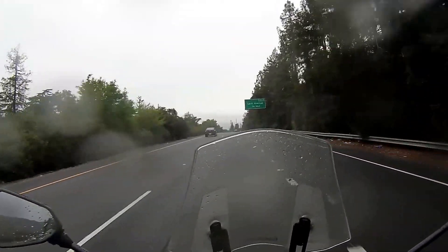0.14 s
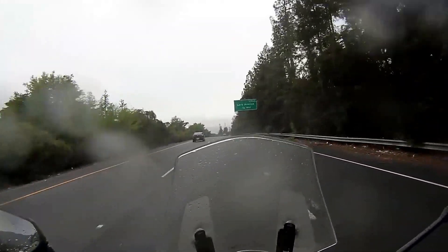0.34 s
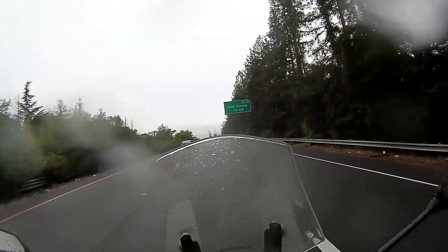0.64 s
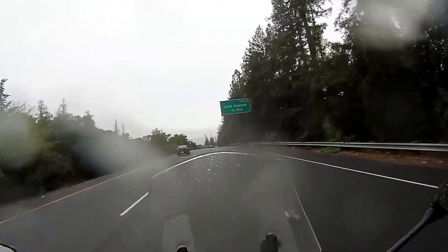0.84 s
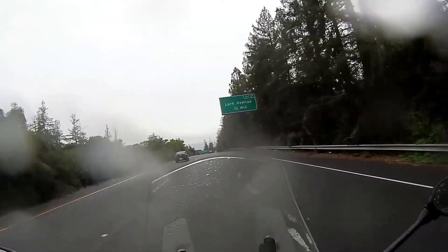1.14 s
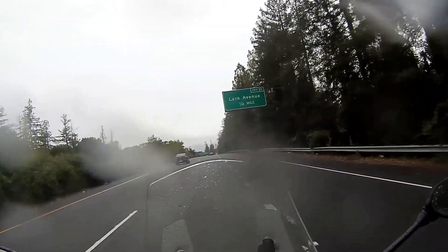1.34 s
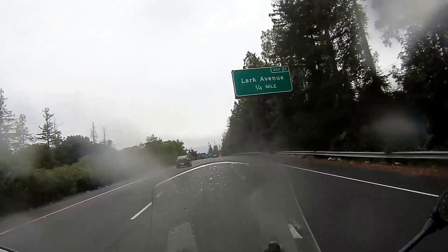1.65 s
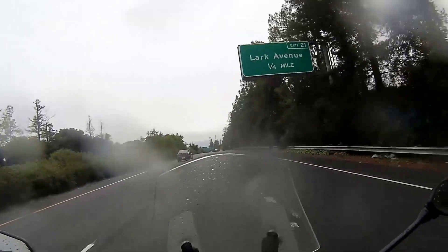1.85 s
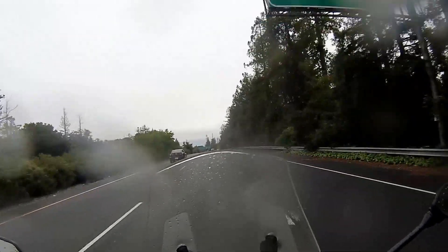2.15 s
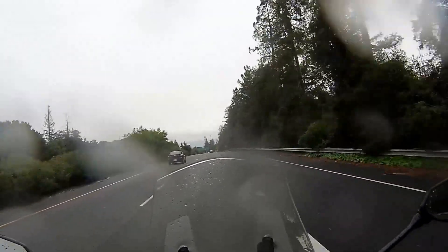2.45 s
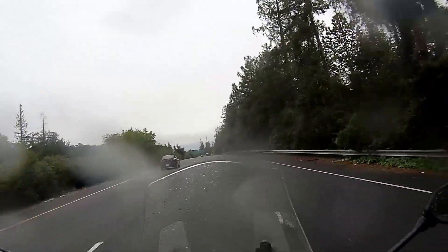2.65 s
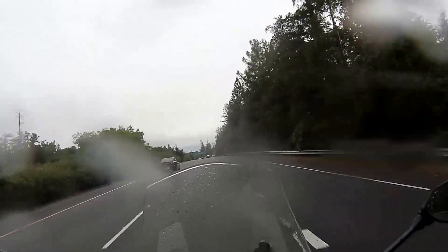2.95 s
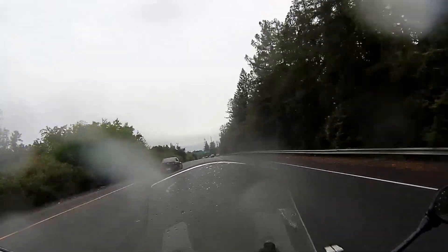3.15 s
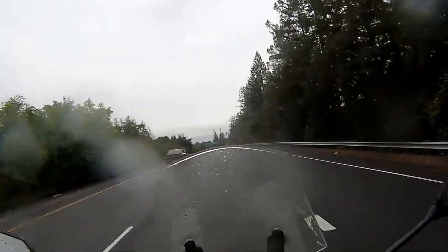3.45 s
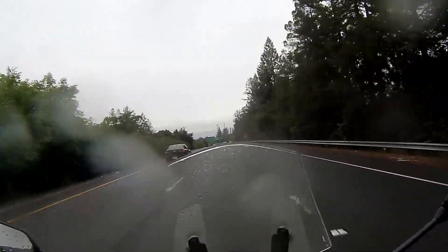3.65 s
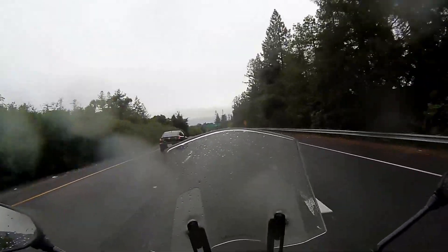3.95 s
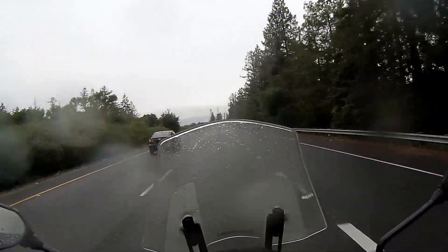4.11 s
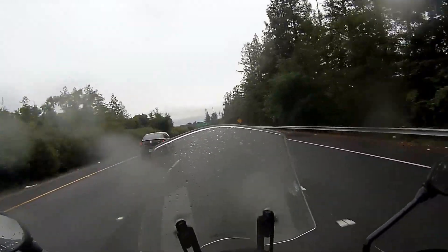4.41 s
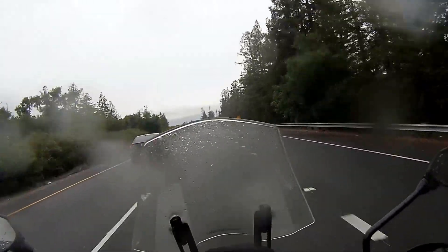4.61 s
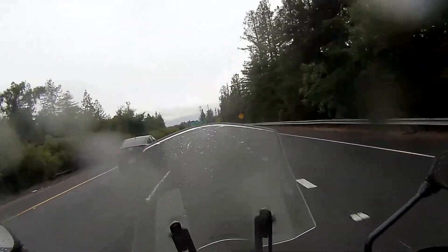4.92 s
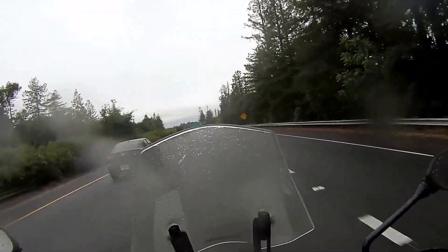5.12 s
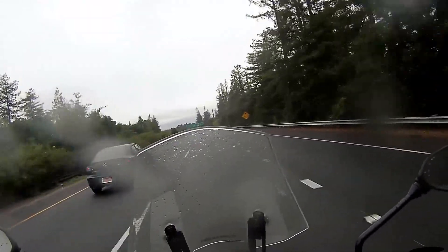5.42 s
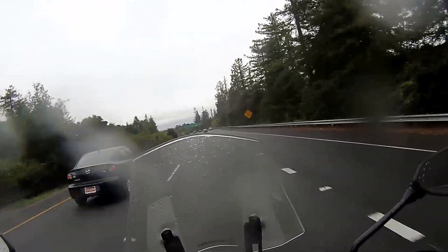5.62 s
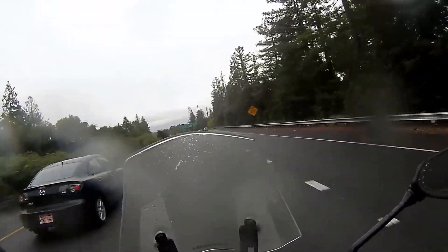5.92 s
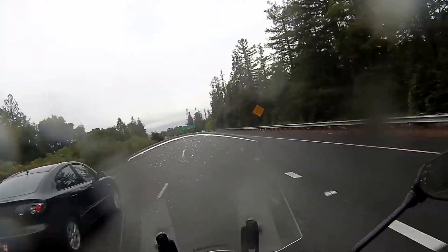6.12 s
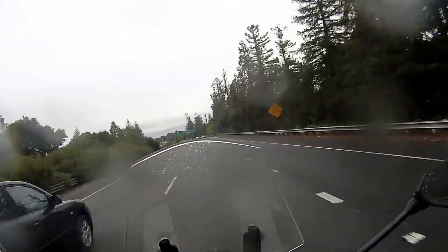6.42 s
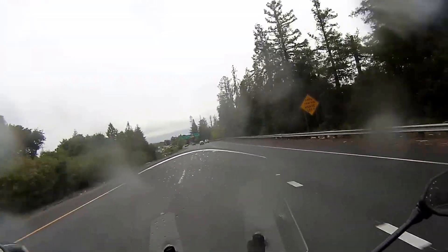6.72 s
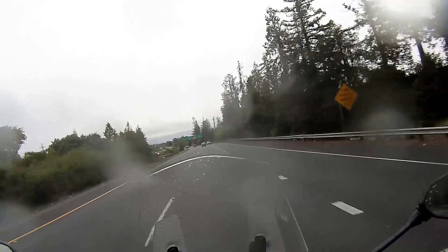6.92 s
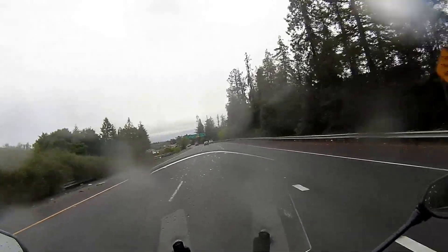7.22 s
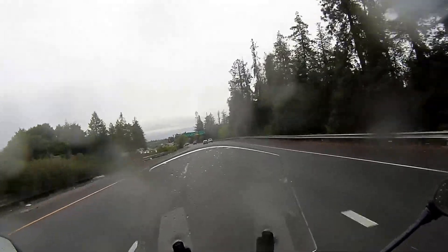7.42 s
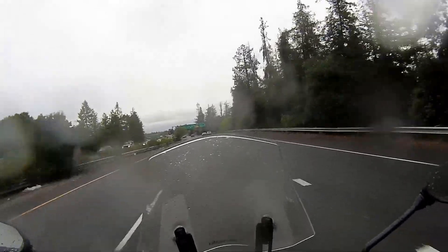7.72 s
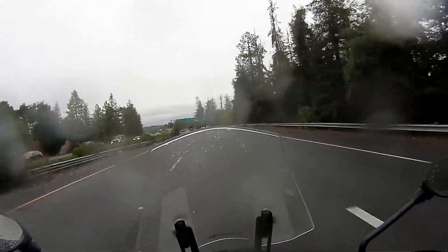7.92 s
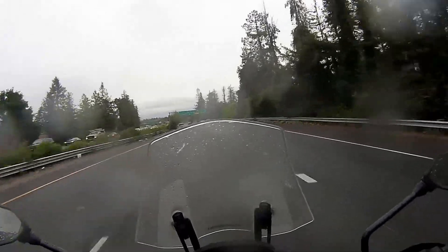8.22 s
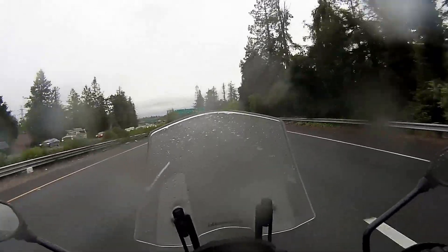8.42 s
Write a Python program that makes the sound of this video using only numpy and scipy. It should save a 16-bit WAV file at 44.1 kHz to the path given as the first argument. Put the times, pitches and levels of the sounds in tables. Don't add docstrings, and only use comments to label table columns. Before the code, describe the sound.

Rapid, uneven plastic knocking dominates from start to finish, single blows mixed with pairs and bursts of three or four, plus dull bumps. Deep fluttering wind swells and lulls around them. Behind it come muffled wet-tyre noise, sparse bright rain ticks, and a weak low engine drone. The close, boxed-in microphone sounds gritty, harsh and clipped, with thin bass on the right side.

```python
import sys
import numpy as np
from scipy import signal
from scipy.fft import rfft, irfft
from scipy.io import wavfile
from scipy.ndimage import uniform_filter1d

SR = 44100
rng = np.random.default_rng(int(sys.argv[2]) if len(sys.argv) > 2 else 0)


def transcribe(signal):
    frames = np.atleast_2d(signal).T
    limited = np.clip(frames, -1, 1)
    pcm = np.round(limited * 32767).astype(np.int16)
    wavfile.write(sys.argv[1], SR, pcm)


def voltage_ratio(decibels):
    exponent = np.asarray(decibels, float) / 20
    return 10 ** exponent


N = 377496
MOUNT_HZ, MOUNT_T60_S = 59.4, 0.098


def rms_one(x):
    return x / np.sqrt(np.mean(x ** 2) + 1e-20)


def drift(rate):
    r = np.exp(-80 * np.pi * rate / SR)
    noise = rng.standard_normal(N // 40 + 2002)
    slow = signal.lfilter([1], [1, -2 * r, r * r], noise)[2000:]
    return np.interp(np.arange(N) / 40, np.arange(len(slow)), rms_one(slow))


def clicks(seconds, sizes):
    train = np.full(N, 1e-18)
    at = np.round(np.asarray(seconds) * SR).astype(int)
    np.add.at(train, np.clip(at, 0, N - 1), sizes)
    return train


def ring(train, hz, t60):
    r, w = voltage_ratio(-60 / (t60 * SR)), 2 * np.pi * hz / SR
    return signal.lfilter([0, np.sin(w)], [1, -2 * r * np.cos(w), r * r], train)


def strike(seconds, sizes, modes, ways, spread_db):
    chance = rng.standard_normal((len(seconds), len(modes)))
    total = 0
    for k, (hz, db, t60) in enumerate(modes):
        heights = ways[k] * sizes * voltage_ratio(db + spread_db * chance[:, k])
        total = total + ring(clicks(seconds, heights), hz, t60)
    return total


def patchy_noise(spectrum, shared_db, own_db, rate):
    hz = np.maximum(np.fft.rfftfreq(N, 1 / SR), 1)
    knots, level_db = np.transpose(spectrum)
    colour = rfft(rng.standard_normal(N)) * voltage_ratio(np.interp(np.log(hz), np.log(knots), level_db, right=-90))
    out, together = 0, drift(rate)
    for octave in range(4, 14):
        share = np.clip(1 - abs(np.log2(hz) - octave), 0, 1)
        if octave == 4:
            share[hz < 16] = 1
        out = out + irfft(colour * share, N) * voltage_ratio(shared_db * together + own_db * drift(rate))
    return rms_one(out)


# frequency in Hz, level in dB, decay time t60 in s.
THUD_MODES = [
    (306, -7, .0175),
    (650, -3, .004),
    (840, -6.5, .0046),
    (1260, -9.5, .007),
    (1910, -18, .025),
    (715, -19, .02),
    (915, -23, .022),
]
# frequency in Hz, level in dB, decay time t60 in s.
RING_MODES = [
    (2346, 16, 0.0068),
    (2790, 18, 0.0087),
    (3342, 28, 0.0049),
    (3615, 25.5, 0.0068),
    (4580, 24, 0.0041),
]
THUD_WAY, RING_WAY = (1, -1, 1, -1, -1, 1, -1), (-1, 1, 1, -1, 1)


def knock(seconds, ring_db, thud_db):
    pull = clicks(seconds - .0003, .38 * voltage_ratio(thud_db))
    push = clicks(seconds, 1.08 * voltage_ratio(thud_db)) - pull
    fall, soft = np.exp(-1 / (.00127 * SR)), np.exp(-1 / (.0002 * SR))
    thud = signal.lfilter([1], [1, -fall], push)
    thud = thud + strike(seconds, voltage_ratio(thud_db), THUD_MODES, THUD_WAY, spread_db=-0.6)
    bright = strike(seconds, voltage_ratio(ring_db - 1.5), RING_MODES, RING_WAY, spread_db=1.58)
    rebound = np.roll(bright, round(0.0032 * SR)) * voltage_ratio(-13.0)
    return signal.lfilter([(1 - soft) ** 2], [1, -2 * soft, soft ** 2], thud + bright + rebound)


def hard_knocks(s, ring_db, thud_db):
    swing = ring(clicks(s - .0105, -voltage_ratio(0.66 * thud_db - 9.5)), MOUNT_HZ, MOUNT_T60_S)
    return knock(s, ring_db, thud_db) + swing


# start in seconds, ring level in dB.
LONE_BLOWS = [(0.0306, -17), (0.376, -20.5), (0.4507, -18.5), (0.4888, -13), (0.6142, -19.5),
              (0.6622, -18.5), (1.0701, -12.5), (1.2283, -17), (1.3167, -15.5), (1.8471, -17),
              (1.8877, -14), (1.9775, -23), (2.711, -21), (3.4537, -20), (4.0553, -19.5), (4.1822, -17),
              (5.0454, -14), (5.1664, -17), (5.2561, -16.5), (5.3335, -15.5), (5.4957, -20),
              (5.8648, -17.5), (5.6475, -17.5), (5.9724, -20), (6.2955, -17.5), (6.5073, -16),
              (6.6643, -18), (7.6224, -15.5), (7.6729, -19.5), (7.8936, -17.5)]
# start in seconds, one swing in s, harder second blow in dB, first weaker by dB.
GROWING_PAIRS = [(0.1262, .0172, -11, 7.5), (0.233, 0.018, -9.5, 16), (0.5486, 0.015, -12.5, 6),
                 (0.7239, 0.019, -15, 4), (1.133, 0.021, -21, -1), (2.2218, 0.022, -13, 6),
                 (2.2654, 0.019, -9, 9.5), (2.307, .0184, -13.5, 1.2), (2.5305, .0192, -16.5, 1.5),
                 (2.8503, 0.016, -14.5, 5), (3.1528, .018, -13, 9), (3.8041, 0.017, -10.5, 4),
                 (4.7354, .0209, -19.5, 6), (5.613, .015, -14.5, 1.5), (6.019, 0.022, -15, 2.5),
                 (6.1659, 0.018, -16.5, 0), (6.5727, 0.017, -11.5, 2.5)]
# start in seconds, one swing in s, first blow in dB, bounce weaker by dB.
DYING_PAIRS = [(0.1904, 0.018, -16.5, 4.5), (0.8904, 0.016, -23.5, 2.5), (2.4715, 0.02, -14, 0.5),
               (2.7547, 0.019, -12, 8), (3.046, .0171, -13, 19), (3.292, .0194, -14, 3),
               (3.498, .0232, -14, 12), (3.5622, 0.02, -21, 0), (3.6537, 0.021, -21, -2.5),
               (3.9621, 0.019, -17, -1), (4.1067, .0251, -13, 7), (4.4221, 0.019, -17.5, 3),
               (5.1086, 0.017, -21.5, 2), (5.6684, .0231, -23.5, .3), (6.3942, 0.018, -17.5, 2),
               (6.8736, .0169, -15, 3.5), (6.9619, .0205, -21.5, 1.5), (7.125, 0.018, -13, 9),
               (7.3003, 0.019, -10.5, 12), (7.738, .0107, -21, 5), (7.8027, .0181, -18, 1),
               (7.9984, 0.016, -23, 0), (8.3532, .0168, -20.5, -0.5)]
# start in seconds, one swing in s, crest level in dB, crest delay in swings.
RATTLES_OF_THREE = [(0.2977, 0.016, -11.5, 0.19), (1.4097, 0.013, -13, 1.4), (1.5698, 0.016, -12, 1),
                    (1.7453, 0.013, -14, 0.59), (2.037, .0149, -12, 0.28), (2.3927, 0.019, -18, 0.76),
                    (2.6164, 0.017, -10.5, .95), (3.2332, .018, -10, 0.31), (6.7969, 0.015, -13, 0.96),
                    (8.2177, .0214, -19.5, 1.4)]
# start in seconds, one swing in s, crest level in dB, crest delay in swings.
RATTLES_OF_FOUR = [(1.5114, 0.016, -15, 1.6), (2.132, 0.017, -9.5, 0.3), (4.3098, .0188, -16, 0.89),
                   (4.649, 0.019, -21, 0.92), (5.3604, .02, -12, 0.96), (7.0316, .023, -21, 1.3),
                   (7.3498, 0.023, -12, 1.1)]
# start in seconds, thud level in dB.
DULL_BUMPS = [(0.0185, -0.5), (0.583, -15), (0.5997, -7), (0.7024, -3.5), (1.0855, -3), (1.3, -6),
              (1.3322, -3.5), (1.454, -12), (1.834, -6), (2.6018, -2), (3.0021, -7), (4.544, -5),
              (4.808, -15), (5.279, -7), (5.748, -3.5), (6.1453, -10), (6.1956, -3), (6.3384, -4),
              (6.527, -13), (6.781, -3), (7.846, -6)]
FADE_DB = 2.5
BUMP_RING_DB = -24
THUD_DB, THUD_FOLLOWS, THUD_SPREAD_DB = -2, 0.64, 1.5
THUD_DUCKED, THUD_OF_SLAM = 0.27, 0.21


def blows(gain_db):
    rows = list(LONE_BLOWS)
    for s, gap, db, less in GROWING_PAIRS:
        rows += [(s, db - less), (s + gap, db)]
    for s, gap, db, less in DYING_PAIRS:
        rows += [(s, db), (s + gap, db - less)]
    for count, fade_db, table in ((3, FADE_DB, RATTLES_OF_THREE), (4, FADE_DB / 2, RATTLES_OF_FOUR)):
        for s, gap, db, crest in table:
            rows += [(s + k * gap, db - fade_db * (k - crest) ** 2) for k in range(count)]
    s, ring_db = np.transpose(rows)
    now = gain_db[(s * SR).astype(int)]
    soon = gain_db[((s + .008) * SR).astype(int)]
    thud_db = THUD_DB + THUD_FOLLOWS * (ring_db + 18)
    thud_db = thud_db + THUD_DUCKED * now + THUD_OF_SLAM * np.maximum(now - soon, 0)
    thud_db = thud_db + THUD_SPREAD_DB * rng.standard_normal(len(s))
    bump_s, bump_db = np.transpose(DULL_BUMPS)
    return np.append(s, bump_s), np.append(ring_db, bump_db + BUMP_RING_DB), np.append(thud_db, bump_db)


# start in seconds, gain dip in dB.
FORWARD_OVERLOADS = [(0.145, 14), (0.492, 8.5), (0.743, 9.5), (1.889, 10), (2.163, 8.5), (2.286, 11),
                     (2.401, 2), (2.636, 15), (2.869, 11), (3.173, 14.5), (3.6, -1), (4.107, 10), (4.33, 7),
                     (5.047, 5), (5.335, 6.5), (5.379, 16.5), (6.183, 7), (6.296, 6.5), (6.395, 7),
                     (6.509, 12.5), (6.589, 13), (6.797, 10), (7.298, 5.5), (7.537, 2), (7.822, 6.5),
                     (8.285, 12.5)]
# start in seconds, gain dip in dB.
BACKWARD_OVERLOADS = [(1.541, 11.5), (2.049, 10), (2.425, 12.5), (2.698, -5), (3.761, 14), (4.59, 14.5),
                      (4.784, 14), (7.189, 11.5), (7.747, 6), (7.959, 10), (8.256, 13)]
RECOVERY_DB_PER_S = 84.5
WINDUP_DB, WINDUP_S = -10, 0.014


def slams():
    t, swing, gain_db = np.arange(N) / SR, np.zeros(N), np.zeros(N)
    for height, table in ((.3, FORWARD_OVERLOADS), (-0.74, BACKWARD_OVERLOADS)):
        for s, dip_db in table:
            near = slice(round((s - .03) * SR), round((s + .3) * SR))
            since = t[near] - s
            swing[near] += height * voltage_ratio(0.61 * dip_db - 8.0) * np.exp(-(since / 0.0021) ** 2)
            if height < 0:
                rock = np.cos(2 * np.pi * MOUNT_HZ * (since + 0.0016))
                rock = rock * np.exp(-((since + 0.0051) / WINDUP_S) ** 2)
                swing[near] -= voltage_ratio(WINDUP_DB) * rock * np.clip(.5 - since / 0.0038, 0, 1)
            onset = np.clip((since - .002) / 0.0013, 0, 1)
            dip = onset * np.minimum(RECOVERY_DB_PER_S * since - dip_db, 0)
            gain_db[near] = np.minimum(gain_db[near], dip)
    return swing, gain_db


# start in seconds, ring level in dB.
LIGHT_TOUCHES = [(0.784, -25.5), (0.827, -25), (0.9561, -22), (1.3782, -24), (1.63, -21.5), (1.9277, -22.5),
                 (2.018, -19.5), (2.446, -33), (2.671, -27), (2.693, -26), (2.8317, -26), (3.359, -27),
                 (3.842, -23.5), (3.861, -28), (3.883, -25), (3.903, -33), (4.5783, -20), (4.598, -29.5),
                 (5.9361, -22), (4.998, -20.5), (5.444, -25), (6.2138, -22), (6.5518, -24.5), (7.005, -29),
                 (7.256, -24.5), (7.517, -35), (8.279, -32), (8.304, -29), (8.445, -22.5), (8.5278, -21.5)]


def light_knocks():
    s, ring_db = np.transpose(LIGHT_TOUCHES)
    return knock(s, ring_db, ring_db + 17.0)


# frequency in Hz, level in dB per Hz.
BUFFET_SPECTRUM = [(12, -38), (30, -13.5), (45, -3), (56, 2.5), (75, 0), (110, -7.5), (160, -18),
                   (260, -24), (500, -62)]


def buffeting(level_db):
    return voltage_ratio(level_db + 8.5) * patchy_noise(BUFFET_SPECTRUM, shared_db=1.5, own_db=0.5, rate=12)


def held_still(s, thud_db):
    near = uniform_filter1d(clicks(s, np.minimum(voltage_ratio(thud_db), 1)), 701) * 701
    return 1 - .55 * uniform_filter1d(np.minimum(near, 1), 221)


def chatter(shake):
    s = np.flatnonzero((shake[:-1] < 0) & (shake[1:] >= 0)) / SR
    size_db = 1.7 * rng.standard_normal((len(s), 2))
    return knock(s, size_db[:, 0] - 32.0, size_db[:, 1] - 24.0)


# start in seconds, peak level in dB.
RAINDROPS = [(0.117, -37), (0.202, -30.5), (0.403, -30.5), (0.886, -41), (1.017, -30), (1.05, -27),
             (1.533, -32), (2.28, -35), (2.424, -25), (3.029, -32), (3.4, -35), (3.638, -27), (4.69, -31),
             (5.095, -31), (5.114, -30), (5.683, -36), (5.812, -36), (6.221, -36), (7.643, -33),
             (7.655, -37), (7.745, -32), (7.79, -29)]
# frequency in Hz, level in dB, decay time t60 in s.
SHELL_MODES = [
    (4500, -3, .007),
    (5400, -3, .006),
    (3300, -12, .005),
]


def raindrops():
    s, peak_db = np.transpose(RAINDROPS)
    return strike(s, voltage_ratio(peak_db + 10.0), SHELL_MODES, (1, -1, 1), spread_db=3.0)


# frequency in Hz, level in dB per Hz.
SPRAY_SPECTRUM = [(80, 17.5), (150, 17.5), (330, 12.5), (520, -2), (700, -3), (1000, -3.5), (1400, -7.5),
                  (1700, -13), (2500, -11), (3000, -15.5), (4400, -17), (6600, -18)]


def road_spray(level_db):
    return voltage_ratio(level_db + 18.5) * patchy_noise(SPRAY_SPECTRUM, shared_db=1.97, own_db=1.23, rate=38)


# time in seconds, buffeting level in dB, road and spray level in dB.
RIDE_LEVELS = [(0, -23.5, -38), (1, -22, -37), (2, -20.5, -36.5), (3, -21.5, -39), (4, -20, -38),
               (4.9, -20, -37.5), (5.8, -19.5, -35), (6.7, -21, -36), (7.5, -18.5, -37.5),
               (8.56, -21.5, -36)]
# time in seconds, buffeting change in dB, spray change in dB.
GUSTS_AND_LULLS = [(.21, 3.5, 3.5), (.32, -1, 2.5), (.54, -6, 4.5), (.86, -11, 1.5), (1.18, 5, -1),
                   (1.5, -10, -1), (1.6, 2.5, 3.5), (1.71, -10, 2), (2.03, 0, 5), (2.35, -6, 4),
                   (2.46, 6.5, .5), (2.68, -1.5, -8), (2.89, 3, 5.5), (3.0, 5, 1), (3.1, -4, -3.5),
                   (3.21, 6, 7), (3.53, 3, -2.5), (3.74, 1.5, -2), (4.07, 5.5, -2), (4.6, -1.5, 2.5),
                   (5.2, 5.5, -2), (5.46, -2, 5.5), (5.56, -5, 2.5), (5.92, -5.5, 1), (6.53, 4, -3.5),
                   (6.85, 5, 2.5), (7.1, -2, -1), (7.49, 4.5, -4.5), (7.7, -1.5, 4), (7.81, -9, -2)]
GUST_HALF_S = .09
GUST_LEAD_S, GUST_SPAN_S = 0.019, .03
GUST_SHARE, GUST_STAYS, SPRAY_GUST_SHARE = 0.65, 0.24, .1


def ride(gain_db):
    t = np.arange(N) / SR
    s, buffet_db, spray_db = np.transpose(RIDE_LEVELS)
    ahead_db = np.interp(t + GUST_LEAD_S, t, gain_db)
    swell_db = uniform_filter1d(np.maximum(gain_db - ahead_db, 0), round(GUST_SPAN_S * SR))
    buffet_db = np.interp(t, s, buffet_db) + GUST_SHARE * swell_db - GUST_STAYS * gain_db
    spray_db = np.interp(t, s, spray_db) + SPRAY_GUST_SHARE * swell_db
    levels = np.array([buffet_db, spray_db])
    for at, *change_db in GUSTS_AND_LULLS:
        levels = levels + np.outer(change_db, np.maximum(1 - abs(t - at) / GUST_HALF_S, 0))
    return levels


# frequency in Hz, width in Hz, level in dB.
ENGINE_TONES = [
    (133.9, 12.8, -22.5),
    (4270, 55, -51),
]


def engine():
    total = 0
    for hz, width, db in ENGINE_TONES:
        total = total + voltage_ratio(db) * rms_one(ring(rng.standard_normal(N), hz, 2.2 / width))
    return total


def scene():
    swing, gain_db = slams()
    blow_s, ring_db, thud_db = blows(gain_db)
    buffet_db, spray_db = ride(gain_db)
    buffet = buffeting(buffet_db)
    shake = signal.sosfilt(signal.butter(2, [30, 110], "band", fs=SR, output="sos"), buffet)
    steady = held_still(blow_s, thud_db) * buffet + chatter(shake) + road_spray(spray_db) + engine()
    mono = voltage_ratio(gain_db) * steady
    mono = mono + swing + hard_knocks(blow_s, ring_db, thud_db) + light_knocks() + raindrops()
    return np.array([mono, mono])


def diaphragm(x):
    knee, reach = .7, .42
    slow = signal.sosfiltfilt(signal.butter(2, 900, fs=SR, output="sos"), x)
    over = np.maximum(slow - knee, 0)
    return x - over + reach * np.tanh(over / reach)


SIDE_KEPT_HZ, SMEAR_DB, LOUD_DB = 1690, -27, -31


def joint_stereo(left, right):
    hz, _, (mid, side) = signal.stft([left + right, left - right], SR, nperseg=1024)
    treble = np.sqrt(np.sum(abs(mid[hz > 500]) ** 2, axis=0))
    loud = treble > voltage_ratio(LOUD_DB + 1.5 * rng.standard_normal(len(treble)))
    kept = (hz < SIDE_KEPT_HZ) | (abs(hz - 12000) < 700)
    random_phase = np.exp(2j * np.pi * rng.random(mid.shape))
    coarse = voltage_ratio(SMEAR_DB) * mid * (hz > 700)[:, None] * random_phase
    side = side * (kept[:, None] | loud) + coarse * loud
    side = signal.istft(side, SR, nperseg=1024)[1][:N]
    return (left + right + side * [[1], [-1]]) / 2


def band_limit(x):
    return signal.sosfilt(signal.butter(12, 16480, fs=SR, output="sos"), x)


HISS_DB, LEFT_OFFSET = -55.5, .02
RIGHT_BASS_CUT_HZ, TOP_HZ = 305, 15250


def record(dry):
    slow = signal.resample_poly(diaphragm(dry[0]), 40, 147)
    slow = np.clip(slow + voltage_ratio(HISS_DB) * rng.standard_normal(len(slow)), -1.1, 1.25)
    right = signal.lfilter(*signal.butter(1, RIGHT_BASS_CUT_HZ, "high", fs=12000), slow)
    held = np.repeat([slow + LEFT_OFFSET, right], 4, axis=1)
    out = signal.resample_poly(held, 147, 160, axis=1)[:, :N]
    top = signal.cheby2(12, 44, TOP_HZ + 550, fs=SR, output="sos")
    out = joint_stereo(*np.clip(signal.sosfilt(top, out), -1, 1))
    return band_limit(np.clip(out, -1, 1))


dry = scene()
out = record(dry)
transcribe(out)
```